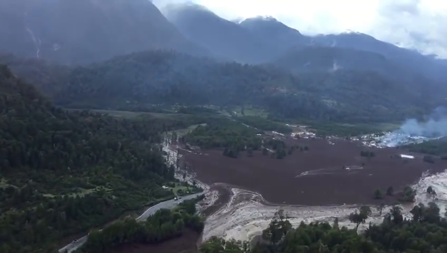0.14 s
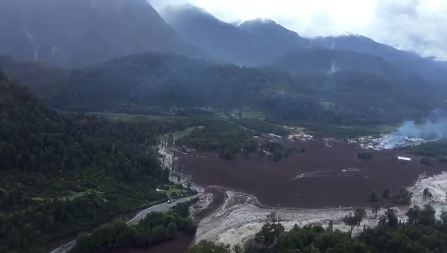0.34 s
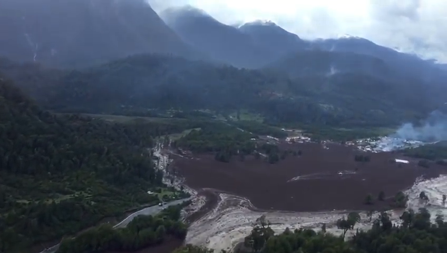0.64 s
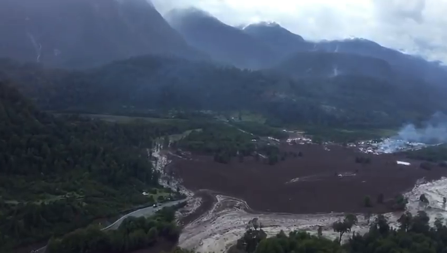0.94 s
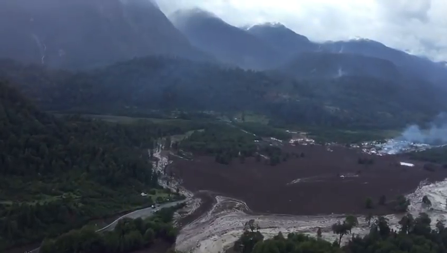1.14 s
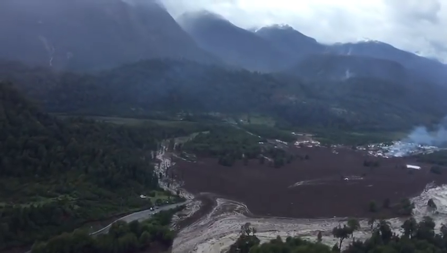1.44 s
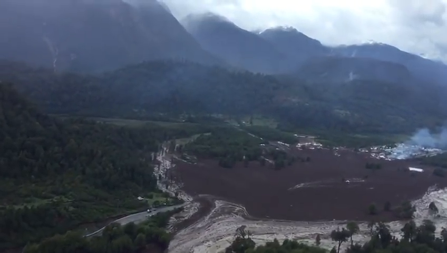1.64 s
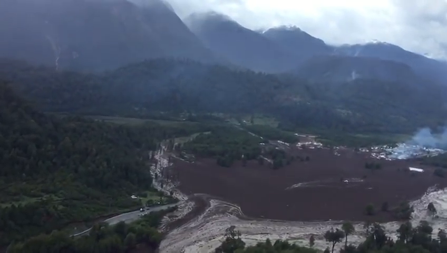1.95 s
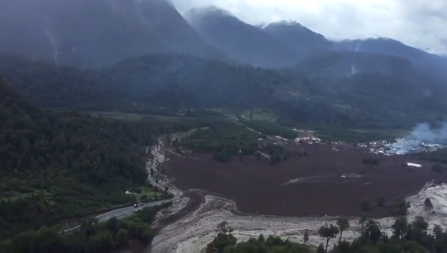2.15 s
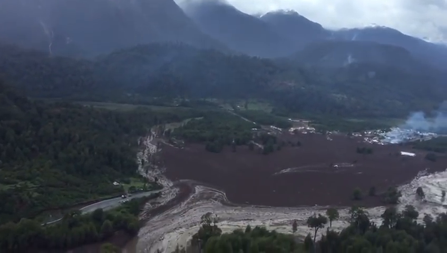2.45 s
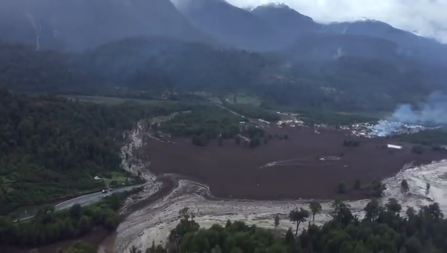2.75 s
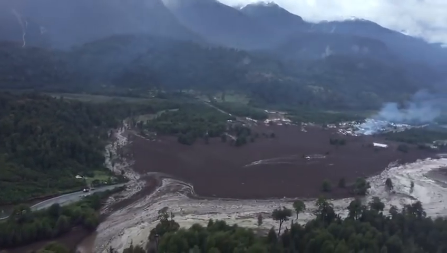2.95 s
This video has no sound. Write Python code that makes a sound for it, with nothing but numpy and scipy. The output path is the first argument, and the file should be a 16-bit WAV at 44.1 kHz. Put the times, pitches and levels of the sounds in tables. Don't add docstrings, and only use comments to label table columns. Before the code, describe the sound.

Helicopter cabin noise in unbroken flight over a valley: deep droning rotor hum, rumbling hull and airy roar, with a piercing gearbox whine that swells and dips, heard by a microphone inside the cabin.

```python
import sys
import numpy as np
from scipy import signal
from scipy.fft import rfft, irfft, next_fast_len
from scipy.io import wavfile

SR = 44100
rng = np.random.default_rng(int(sys.argv[2]) if len(sys.argv) > 2 else 0)


def gain_from_db(level_db):
    decades = np.asarray(level_db, float) / 20
    return 10 ** decades


def to_wav(sig):
    pcm = np.clip(np.atleast_2d(sig), -1, 1) * 32767
    pcm = np.round(pcm).astype(np.int16)
    wavfile.write(sys.argv[1], SR, pcm.T)


N = 136269

ROTOR_HZ, SHAFT_HZ = 6.4022, 99.96
BLADE_HZ = 4 * ROTOR_HZ


def clock():
    return np.arange(N) / SR


def trend(db, db_per_s):
    return db + db_per_s * (clock() - N / SR / 2)


def drift(rate_hz):
    every = 100
    settle = 1000
    pole = np.exp(-2 * np.pi * rate_hz * every / SR)
    white = rng.standard_normal(N // every + 2 + settle)
    slow = signal.lfilter([1], [1, -2 * pole, pole * pole], white)[settle:]
    slow = slow / np.sqrt(np.mean(slow ** 2))
    return np.interp(np.arange(N) / every, np.arange(len(slow)), slow)


def turning():
    speed_wander = .0002
    return np.cumsum(1 + speed_wander * drift(1.54)) / SR


def tone(turn, hz, db):
    flutter_db = .9
    gain = np.sqrt(2) * gain_from_db(db + flutter_db * drift(3.))
    return gain * np.sin(2 * np.pi * (hz * turn + rng.random()))


def noise(spectrum, db, patchy_db):
    size = next_fast_len(N, real=True)
    hz = np.arange(size // 2 + 1) * SR / size + 1e-3
    corner_hz, corner_db = np.transpose(spectrum)
    low, high = corner_hz[0], corner_hz[-1]
    envelope = gain_from_db(np.interp(np.log(hz), np.log(corner_hz), corner_db))
    shaped = rfft(rng.standard_normal(size)) * envelope * (hz >= low) * (hz < high)
    place = 4 * np.log2(hz / low)
    out = 0
    for k in range(int(4 * np.log2(high / low)) + 2):
        overlap = np.clip(1 - abs(place - k), 0, 1)
        out = out + irfft(shaped * overlap, size)[:N] * gain_from_db(patchy_db * drift(9.0))
    return gain_from_db(db) * out / np.sqrt(np.mean(out ** 2))


def main_rotor(turn):
    # multiple of the turning rate, level in dB rms. First the stronger tones, then more, mostly
    rotor_tones = [(8, -29), (12, -29), (16, -31), (20, -34), (21, -33), (22, -32), (23, -34), (24, -30),
                   (25, -36), (27, -37), (44, -37), (48, -39), (55, -42), (63, -38), (64, -38), (68, -45),
                   (76, -45), (79, -43), (80, -45), (82, -43), (83, -38), (87, -43), (90, -42), (91, -41),
                   (93, -43), (100, -48), (121, -49), (125, -42), (127, -44), (130, -43),
                   (7, -44), (10, -38), (11, -36), (14, -42), (28, -42), (32, -41), (33, -41), (36, -41),
                 (56, -46), (59, -43), (60, -47), (62, -47), (67, -43), (84, -47), (95, -45), (104, -49),
                 (108, -49), (111, -45), (112, -49), (116, -50)]
    out = 0
    for multiple, db in rotor_tones:
        growth = 3 * (multiple < 10)
        out = out + tone(turn, multiple * ROTOR_HZ, trend(db, growth))
    return out


def tail_rotor(turn):
    tail_hz = 34.65
    # multiple of the turning rate, level in dB rms, trend in dB per s.
    tail_tones = [(2, -19.5, .5), (4, -34, 0.), (6, -30, 0.), (8, -41, 0.)]
    return sum(tone(turn, multiple * tail_hz, trend(db, slope)) for multiple, db, slope in tail_tones)


def drive_shaft(turn):
    # multiple of the turning rate, level in dB rms, trend in dB per s.
    shaft_orders = [(1, -30, 0.), (2, -22, 0.), (4, -40, 0.), (6, -37, 0.), (12, -50, 0.), (16, -53, 0.),
                    (24, -44, 0.), (41, -52, 0.)]
    return sum(tone(turn, multiple * SHAFT_HZ, trend(db, slope)) for multiple, db, slope in shaft_orders)


def gears(turn):
    mesh_hz = [97.8, 663.3, 754.2, 773.8, 1261.0, 1631.6, 1795.7, 1847.0, 1891.5, 2477.0, 2790.0, 3424.5,
               4247.3, 5306.0, 6849.8]
    # level in dB rms, trend in dB per s.
    mesh_levels = [(-29, 0.), (-44, 0.), (-40, 0.), (-45, 0.), (-39, -.8), (-44, -.5), (-53, 0.), (-44, 0.),
                   (-50, 0.), (-53, 0.), (-50, 0.), (-46, 5.5), (-52, 0.), (-59, 0.), (-61, 0.)]
    # time in seconds, level in dB rms.
    low_mesh = [
        (0, -31),
        (.4, -31.5),
        (1.6, -32),
        (2.1, -35),
        (2.7, -37),
        (3.09, -34.5),
    ]
    high_mesh = [
        (0, -38),
        (.8, -35),
        (2.2, -34),
        (2.7, -35.5),
        (3.09, -42.5),
    ]
    out = sum(tone(turn, hz, trend(db, slope)) for hz, (db, slope) in zip(mesh_hz, mesh_levels))
    for hz, course in ((1821.4, low_mesh), (2431.5, high_mesh)):
        s, db = np.transpose(course)
        out += tone(turn, hz, np.interp(clock(), s, db))
    return out


def pinion(turn):
    teeth, core_hz, throb = 43, 452.3, .22
    # time in seconds, whine level in dB rms, octave level in dB rms.
    whine_course = [(0, -33, -60), (.22, -33, -60), (.34, -45, -61), (.63, -46, -58), (.82, -38, -51),
                    (1.15, -33, -53), (1.37, -30, -57), (1.6, -35, -64), (1.95, -44, -61), (2.3, -41, -59),
                    (2.76, -38, -62), (2.9, -27, -50), (2.99, -32, -53), (3.09, -27, -54)]
    s, whine_db, octave_db = np.transpose(whine_course)
    hz = teeth * SHAFT_HZ
    shake = 1 + throb * np.sin(2 * np.pi * BLADE_HZ * turn)
    shake += throb / 2 * np.sin(2 * np.pi * 3 * BLADE_HZ * turn)
    out = shake * tone(turn, hz, np.interp(clock(), s, whine_db))
    out += tone(turn, 2 * hz, np.interp(clock(), s, octave_db))
    out += tone(turn, hz - core_hz, -56)
    out += tone(turn, hz + core_hz, -54)
    out += tone(turn, 2 * hz + core_hz, -64)
    return out + tone(turn, 2 * (hz + core_hz), -68)


def hull_rumble():
    # frequency in Hz, level in dB per Hz.
    rumble_spectrum = [(3, -29), (28, -27), (43, -8), (70, -3.5), (100, -4), (200, -7.5), (300, -10.5),
                       (330, -25)]
    return noise(rumble_spectrum, -19.5, patchy_db=3.3)


def cabin_roar():
    # frequency in Hz, level in dB per Hz.
    roar_spectrum = [(280, -16), (330, 1), (470, -3), (600, 0.5), (720, -3.5), (790, -7), (1100, -10),
                     (1420, -15)]
    return gain_from_db(trend(0, -1)) * noise(roar_spectrum, -24.5, patchy_db=2.6)


def turbine_hiss():
    # frequency in Hz, level in dB per Hz.
    hiss_spectrum = [(1380, -5.5), (1750, -2.5), (2100, -2), (2380, -1), (2600, -2), (3200, -1.5),
                     (4300, -3), (4950, -7.5)]
    top_spectrum = [(4920, -2), (5400, 1.5), (5900, -2), (6800, -5), (7600, -9.5), (9400, -11),
                    (10150, -15), (10900, -30)]
    hiss = gain_from_db(trend(0, 0.7)) * noise(hiss_spectrum, -30, patchy_db=.6)
    return hiss + noise(top_spectrum, -38.5, patchy_db=1.2)


def downwash(turn):
    throb = 1 + .06 * np.sin(2 * np.pi * BLADE_HZ * turn)
    return throb * (cabin_roar() + turbine_hiss())


def scene():
    turn = turning()
    tones = main_rotor(turn) + tail_rotor(turn) + drive_shaft(turn) + gears(turn) + pinion(turn)
    return (tones + hull_rumble() + downwash(turn))[None]


def top_cut(x):
    return signal.sosfilt(signal.butter(12, 10700, fs=SR, output="sos"), x)


def record(dry):
    top = 4.5
    mix = top * np.tanh(dry / top)
    return top_cut(mix)


dry = scene()
out = record(dry)
to_wav(out)
```